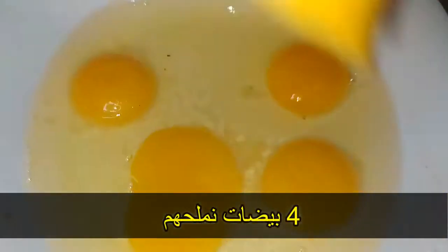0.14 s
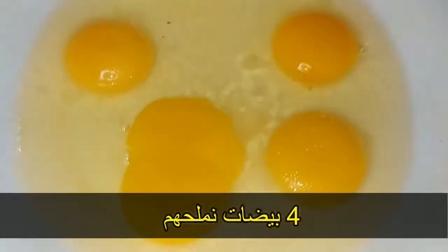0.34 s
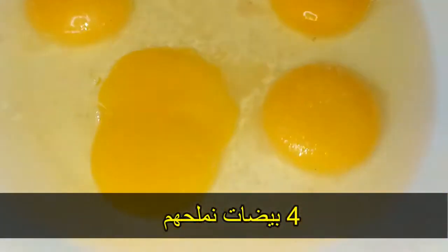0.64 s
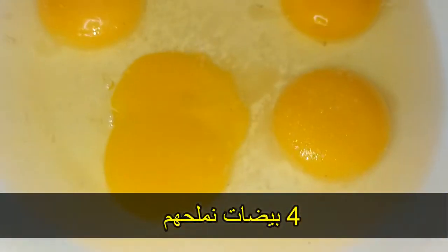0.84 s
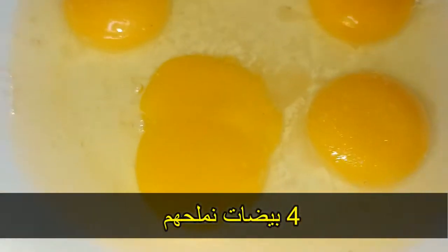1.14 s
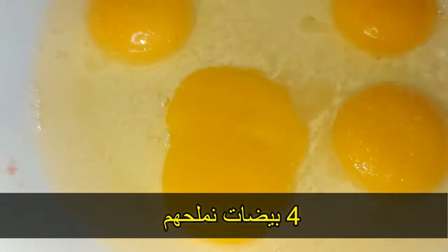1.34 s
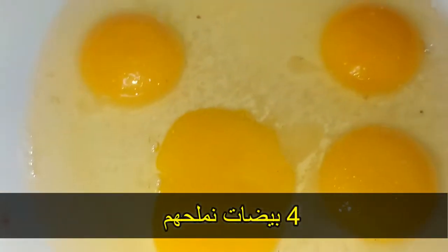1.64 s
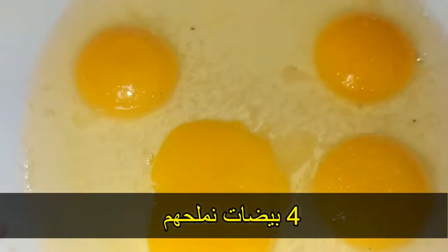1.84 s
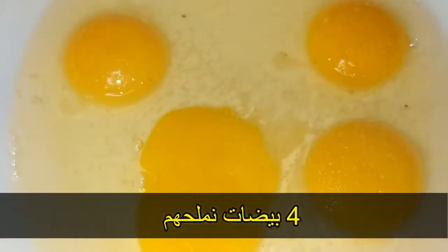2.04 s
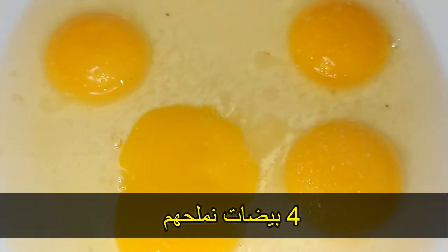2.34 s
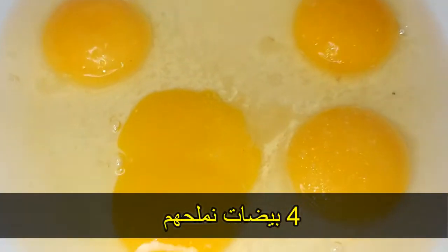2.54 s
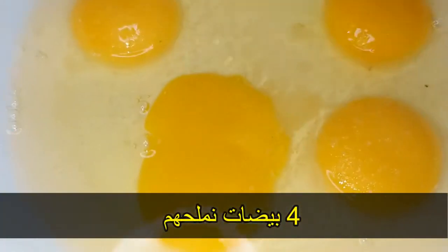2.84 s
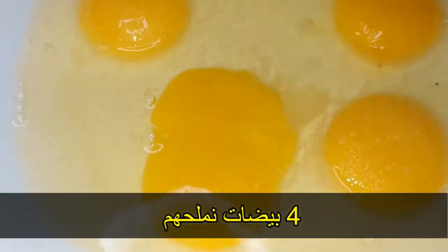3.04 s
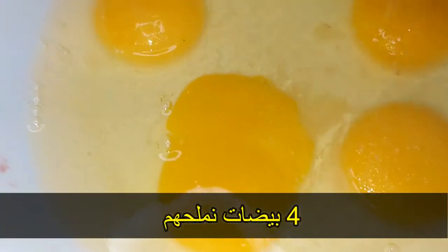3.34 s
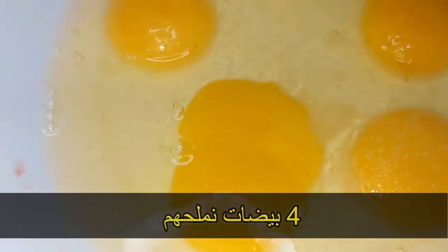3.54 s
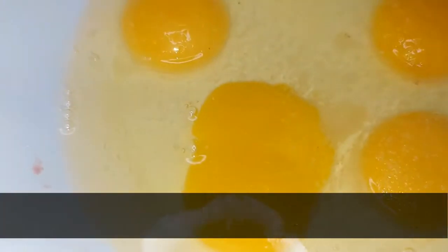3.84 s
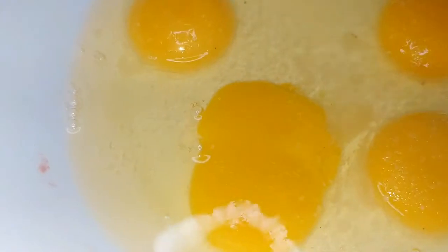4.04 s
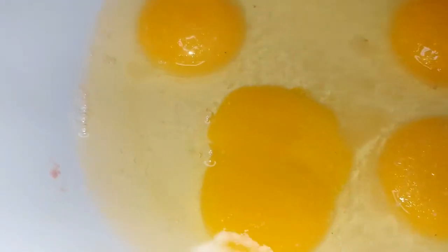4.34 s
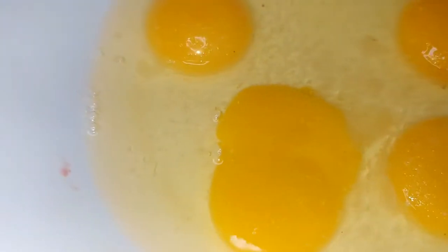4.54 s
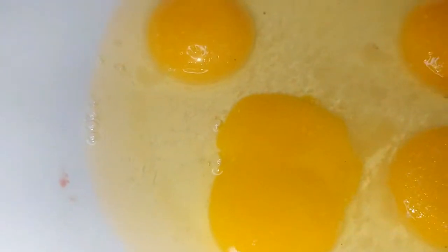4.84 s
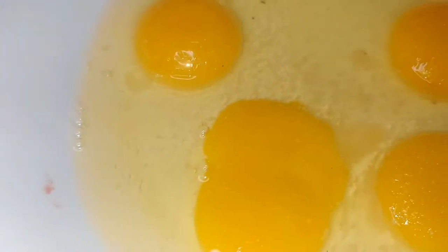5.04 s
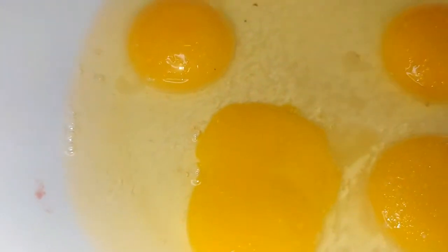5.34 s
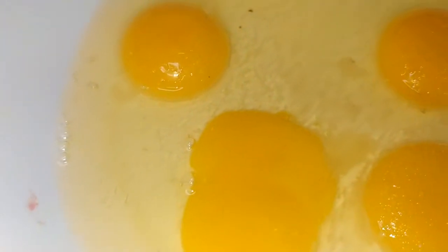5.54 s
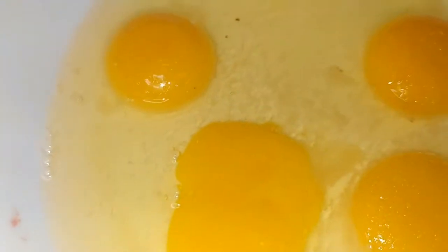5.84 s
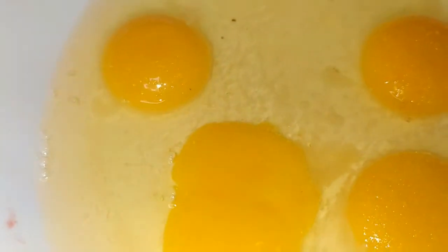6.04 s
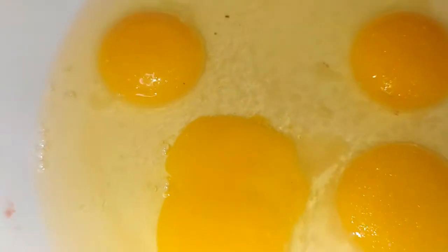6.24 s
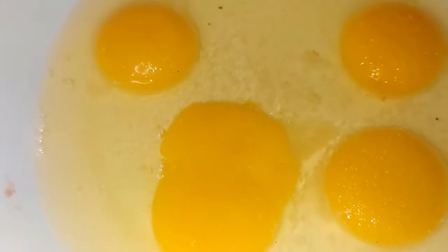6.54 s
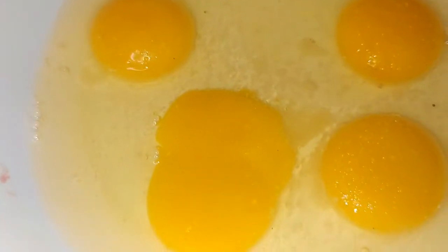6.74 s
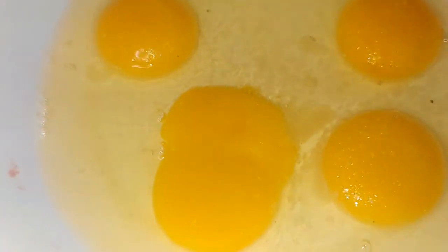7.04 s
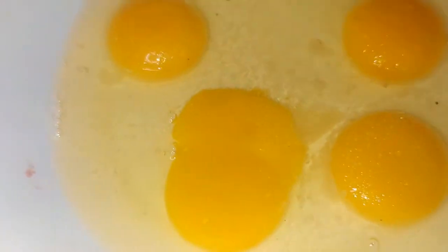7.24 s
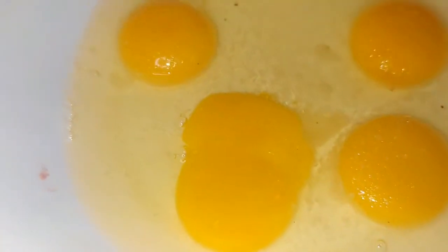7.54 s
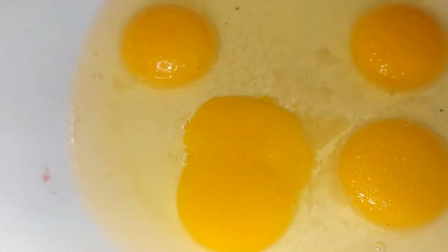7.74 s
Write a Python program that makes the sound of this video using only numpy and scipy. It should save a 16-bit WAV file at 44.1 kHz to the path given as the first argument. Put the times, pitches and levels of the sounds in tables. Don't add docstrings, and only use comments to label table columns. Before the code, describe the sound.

In a small hard kitchen, a refrigerator compressor hums steadily near 295 Hz, slightly wavering, over soft fan noise. From 0 to about 4.9 seconds, a plastic salt shaker is shaken close to two spaced microphones, roughly five cycles a second. Each cycle has a short, bright, sandy hiss as grains hit the cap, then a slightly longer, hollower swish as they fall down the body. The opening strokes are softer; packed lumps add sharper splashes, strongest around 2.6 to 3.4 seconds. At 2.96 seconds the shaker raps the bowl rim: a hard, dry clack with a low worktop thud and brief shudder. After 4.9 seconds, faint trickles fade into the hum. A hand makes a dull double bump on the worktop around 5.8 to 6.0. Sparse grains whisper, then tiny bright ticks and trickles appear from 7.4 to 7.85 seconds. Room echo is short.

```python
import sys
import numpy as np
from scipy import signal
from scipy.fft import rfft, irfft
from scipy.io import wavfile

SR = 44100
rng = np.random.default_rng(int(sys.argv[2]) if len(sys.argv) > 2 else 0)


def store_wav(level_fs):
    pcm = np.round(np.clip(np.atleast_2d(level_fs), -1, 1) * 32767)
    wavfile.write(sys.argv[1], SR, pcm.T.astype(np.int16))


def voltage_ratio(decibels):
    exponent = np.asarray(decibels, float) / 20
    return 10 ** exponent


N = 347508


def unit(x):
    return x / np.sqrt(np.mean(x ** 2) + 1e-20)


def at_hz(points, hz):
    points_hz, points_db = np.transpose(points)
    return np.interp(np.log(hz), np.log(points_hz), points_db)


def sides(pan_db):
    return voltage_ratio(np.multiply.outer([0.5, -0.5], pan_db))


def band_pass(x, order, band_hz):
    return signal.sosfilt(signal.butter(order, band_hz, "band", fs=SR, output="sos"), x)


def high_pass(x, order, hz):
    return signal.sosfilt(signal.butter(order, hz, "high", fs=SR, output="sos"), x)


def drift(rate_hz):
    r = np.exp(-80 * np.pi * rate_hz / SR)
    noise = rng.standard_normal(N // 40 + 2002)
    slow = signal.lfilter([1], [1, -2 * r, r * r], noise)[2000:]
    return np.interp(np.arange(N) / 40, np.arange(len(slow)), unit(slow))


def ring(clicks, hz, t60_s):
    r, w = voltage_ratio(-60 / (t60_s * SR)), 2 * np.pi * hz / SR
    return signal.lfilter([0, np.sin(w)], [1, -2 * r * np.cos(w), r * r], clicks + 1e-18)


def resonate(x, hz, width_hz):
    r = np.exp(-np.pi * width_hz / SR)
    feedback = [1, -2 * r * np.cos(2 * np.pi * hz / SR), r * r]
    return signal.lfilter([(1 - r * r) / 2, 0, (r * r - 1) / 2], feedback, x)


def landings():
    # densest fall in seconds, level in dB, build-up in ms.
    throw_rows = [(0.098, -43.5, 33), (0.284, -35.5, 16), (0.481, -32, 15), (0.674, -34, 22),
                  (0.865, -29.5, 18), (1.056, -35, 26), (1.273, -35.5, 18), (1.496, -35, 19.6),
                  (1.711, -32.5, 20), (1.935, -37.5, 20), (2.152, -35, 17), (2.375, -31.5, 11),
                  (2.592, -29.5, 8.3), (2.799, -34, 19), (2.992, -27.5, 12), (3.186, -33.5, 20),
                  (3.377, -27.5, 16), (3.581, -30, 13.6), (3.785, -32, 16.5), (3.986, -30, 15.6),
                  (4.195, -30, 11.5), (4.392, -32.5, 22), (4.576, -35.5, 19), (4.791, -36, 21)]
    # densest fall in seconds, level in dB, length in ms,
    # share of it spent building up (0-1).
    return_rows = [(0.171, -36.5, 59, .73), (0.357, -29.5, 49, 0.65), (0.556, -30, 46, 0.6),
                   (0.752, -32.5, 54, 0.77), (0.916, -28, 48, 0.38), (1.133, -28, 34, 0.86),
                   (1.352, -29, 39, 0.85), (1.542, -30.5, 47, 0.32), (1.758, -29, 40, .26),
                   (1.989, -27, 40, 0.27), (2.208, -27, 48, 0.23), (2.422, -29, 40, 0.05),
                   (2.642, -27, 33, .22), (2.846, -28, 45, .2), (3.055, -28.5, 57, 0.54),
                   (3.257, -26.5, 38, .77), (3.449, -25.5, 31, 0.86), (3.654, -27, 34, 0.82),
                   (3.852, -28, 34, 0.68), (4.053, -28.5, 45, 0.45), (4.266, -30, 48.5, .69),
                   (4.445, -31, 44, 0.46), (4.64, -29, 39, 0.54), (4.843, -33, 39, 0.53)]
    # densest fall in seconds, level in dB, length in ms, body in dB re hiss.
    stray_rows = [(.0, -41.5, 26, -12), (2.54, -48.5, 60, -10), (2.93, -39, 28, -7.5), (3.92, -44, 32, -5),
                  (4.925, -46.5, 49, -5), (5.065, -50.5, 64, -15), (5.145, -52, 38, -25),
                  (5.3, -49, 20, -20), (5.777, -47.5, 12, -7), (5.925, -55.5, 84, 2), (6.06, -52, 13, -10),
                  (6.497, -48, 9, -21), (6.915, -50.5, 29, -4), (7.174, -49.5, 16, -13),
                  (7.41, -53, 70, -1.5), (7.625, -47, 60, -11), (7.665, -51, 50, -15),
                  (7.778, -43, 14, -22), (7.823, -45.5, 65, -17)]
    # time in seconds, body in dB re hiss.
    tipping = [(0.1, -17), (0.6, -14), (1.4, -11.5), (2.2, -10.5), (4.5, -10), (4.9, -14.5)]

    falls = []
    for s, db, rise_ms in throw_rows:
        fall_ms = 6 * voltage_ratio(-31.5 - db)
        falls.append((s, db, rise_ms, fall_ms, -24.5, 3.5))
    for s, db, ms, build in return_rows:
        body_db = np.interp(s, *np.transpose(tipping))
        falls.append((s, db, ms * build, ms * max(1 - build, 0.05), body_db, 0.3))
    for s, db, ms, body_db in stray_rows:
        falls.append((s, db, ms * 0.4, ms * 0.6, body_db, 1.5))
    return falls


def add_falls(hiss_power, hollow_power):
    t = np.arange(N) / SR
    for s, level_db, rise_ms, fall_ms, body_db, pan_db in landings():
        near = slice(max(0, round((s - 0.15) * SR)), round((s + 0.15) * SR))
        ms = (t[near] - s) * 1000
        reach = np.abs(ms) / np.where(ms < 0, rise_ms, fall_ms)
        flow = voltage_ratio(level_db - 7 * reach ** 2.5) * sides(pan_db)[:, None]
        hiss_power[:, near] += flow ** 2
        lead = round(0.1 * rise_ms * SR / 1000)
        thud = np.roll(flow * voltage_ratio(-4.0 * reach * (ms > 0)), -lead, axis=1)
        hollow_power[:, near] += (thud * voltage_ratio(body_db - 2.0)) ** 2


def add_lumps(hiss_power, hollow_power):
    # start in seconds, peak in dB.
    cap_rows = [(0.1657, -17), (0.476, -16), (0.8555, -18), (0.9063, -21), (1.2595, -19.5), (1.6945, -29),
                (2.371, -28), (2.5855, -23), (3.178, -13), (3.37, -10.5), (3.5758, -20), (3.778, -19),
                (4.1897, -14.5), (4.5707, -18)]
    # start in seconds, peak in dB.
    bottom_rows = [(1.7549, -29), (1.9784, -22), (2.2019, -20), (2.4199, -24), (2.6376, -10), (2.8374, -17),
                   (3.2244, -26), (3.4215, -24), (3.6244, -15), (3.8372, -21), (4.6194, -31), (7.7757, -41)]
    t = np.arange(2000) / SR
    rise = np.minimum(t * 1000 / 1.64, 1)
    for rows, body_db in ((cap_rows, -27), (bottom_rows, -20)):
        for s, peak_db in rows:
            at = round(s * SR)
            splash = (voltage_ratio(peak_db - 8.5 - 60 * t / 0.038) * rise) ** 2
            hiss_power[:, at:at + 2000] += splash
            hollow_power[:, at:at + 2000] += splash * voltage_ratio(2 * body_db - 6.0)


def wall_hiss(grains, cycles=52.0, patch_db=3.5):
    # frequency in Hz, level in dB per Hz.
    grain_spectrum = [(4490, -10), (5710, -22.5), (7040, -8), (8050, -19.5), (8900, -6), (9800, -4.5),
                      (10700, -8.5), (12300, -27.5), (14000, -18), (15600, -28)]
    pitches_hz = np.geomspace(5000, 15700, 28)
    dealt = rng.integers(0, 28, (2, N))
    walls = 0
    for k, hz in enumerate(pitches_hz):
        gain = voltage_ratio(at_hz(grain_spectrum, hz) + patch_db * drift(6.5)) * hz
        walls = walls + gain * ring(grains * (dealt == k), hz, cycles / hz)
    return unit(band_pass(walls, 2, [5600, 16500]))


def hollow_body(grains, patch_db=2.23):
    # frequency in Hz, width in Hz, level in dB.
    body_modes = [(1803, 360, 8.5), (2424, 78, -3.5), (2827, 410, 3), (3310, 620, 9.5), (3976, 930, 8),
                  (4456, 1170, 7.5)]
    body = 0
    for hz, width_hz, db in body_modes:
        mode = resonate(resonate(grains, hz, width_hz), hz, 2 * width_hz)
        body = body + voltage_ratio(db + patch_db * drift(6.8)) * mode / np.sqrt(width_hz)
    return unit(high_pass(body, 4, 1450))


def salt(grains_per_s=16000, spread_db=2.0, clump_db=1.73):
    hiss_power, hollow_power = np.zeros((2, N)), np.zeros((2, N))
    add_falls(hiss_power, hollow_power)
    add_lumps(hiss_power, hollow_power)
    sizes = voltage_ratio(spread_db * np.minimum(rng.exponential(1, N), 5) + clump_db * drift(41))
    strikes = sizes * (rng.random(N) < grains_per_s / SR)
    grains = strikes * rng.choice([-1, 1], (2, N))
    hiss = wall_hiss(grains) * np.sqrt(hiss_power) * voltage_ratio(-2.5)
    return hiss + hollow_body(grains) * np.sqrt(hollow_power) * voltage_ratio(0.5)


def compressor(shaft_hz=49.09):
    # multiple of shaft speed, level in dB rms.
    hum_lines = [(1, -67), (3, -70), (5, -67), (6, -43.5), (7, -64), (8, -65), (11, -67.5), (15.2, -76)]
    # time in seconds, level in dB.
    swell_points = [(0.0, -53), (0.6, -52.6), (1.0, -53), (1.7, -52), (3.2, -51.4), (4.2, -52),
                    (4.5, -51.5), (5.5, -51.5), (6.2, -51.5), (6.9, -52.5), (7.88, -51.5)]
    turn = 2 * np.pi * np.cumsum(shaft_hz * (1 + 0.00075 * drift(0.88))) / SR
    s, swell_db = np.transpose(swell_points)
    swell_db = np.interp(np.arange(N) / SR, s, swell_db - np.mean(swell_db))
    out = 0
    for k, db in hum_lines:
        waver_db = swell_db + 1.0 * drift(50) if k == 6 else 2.44 * drift(2.8)
        phase = rng.uniform(0, 2 * np.pi) + np.array([[0], [0.15]]) * k / 6
        out = out + np.sqrt(2) * voltage_ratio(db + waver_db) * np.sin(k * turn + phase)
    return out


def fan(flicker_db=0.84):
    # frequency in Hz, level in dB per Hz.
    low_spectrum = [(12, -78.5), (25, -82), (50, -83.5), (80, -92), (120, -95.5), (165, -87.5),
                    (260, -92.5), (400, -88.5), (600, -92.5)]
    high_spectrum = [(600, -91), (1000, -96.5), (1500, -97.5), (2000, -95.5), (2700, -88), (3500, -101),
                     (4200, -93), (6000, -102), (7200, -99), (8000, -99), (8900, -91.5), (10200, -98.5),
                     (11500, -101), (14000, -107), (16000, -116), (18000, -140)]
    # frequency in Hz, left-right likeness (-1 to 1).
    likeness = [(60, 0.54), (180, 0.81), (550, 0.14), (1400, 0), (5000, 0), (15000, 0.15)]
    # frequency in Hz, left-right difference in dB.
    tilt = [(60, -0.5), (200, -2), (700, 0), (2400, 2), (4400, 0.5), (8000, 1), (15000, 4)]
    # frequency in Hz, width in Hz, gain in dB.
    narrow_bands = [(3330, 100, 6), (4770, 170, -9.5), (5780, 160, 0), (8300, 180, 0.5), (11800, 400, -9)]

    hz = np.maximum(np.arange(N // 2 + 1) * SR / N, 1)
    level_db = at_hz([*low_spectrum, *high_spectrum[1:]], hz)
    for dip_hz, width_hz, db in narrow_bands:
        level_db = level_db + db * np.exp(-((hz - dip_hz) / width_hz) ** 2)
    gain = voltage_ratio(level_db) * sides(at_hz(tilt, hz)) * np.sqrt(SR / 2)
    mid, side = rfft(rng.standard_normal((2, N)))
    alike = np.clip(at_hz(likeness, hz), -1, 1)
    pair = np.sqrt(1 + alike) * mid + np.sqrt(1 - alike) * side * [[1], [-1]]
    return irfft(gain * pair, N) * voltage_ratio(flicker_db * drift(5.5))


def bumps():
    # start in seconds, peak in dB, low push in dB,
    # brightness in Hz, decay t60 in seconds.
    bump_rows = [(1.908, -38.5, -64, 1210, 0.033), (2.268, -27.5, -67, 2770, 0.027),
                 (3.03, -27, -45, 342, 0.12), (3.07, -48, -51, 298, 0.38), (5.772, -44.5, -40, 1900, 0.055),
                 (5.798, -48, -47, 500, 0.12), (5.866, -48, -51.5, 1200, 0.15),
                 (5.894, -51, -48, 1080, 0.18), (5.92, -50, -55, 1290, 0.21),
                 (5.962, -25.5, -40, 520, 0.11), (5.964, -32.5, -58, 1730, 0.06),
                 (5.984, -37, -46, 555, 0.12), (6.02, -49, -53, 900, 0.13)]
    out = np.zeros((2, N + SR))
    t = np.arange(SR // 4) / SR
    for s, db, low_db, hz, t60_s in bump_rows:
        noise = rng.standard_normal((3, len(t)))
        fade = voltage_ratio(-60 * t / t60_s) * np.minimum(t / 0.0067, 1)
        puff = unit(band_pass(noise[0] + 0.64 * noise[1:], 3, [170, max(hz, 300)]))
        push = unit(band_pass(noise[0], 2, [75, 260]))
        bump = voltage_ratio(db) * puff * fade + voltage_ratio(low_db) * push * fade ** 0.55
        at = round(s * SR)
        out[:, at:at + len(t)] += bump * sides(-0.8)[:, None]
    return out[:, :N]


def burst(db, band_hz, t60_s):
    noise = band_pass(rng.standard_normal((2, SR)), 2, band_hz)
    return voltage_ratio(db - 60 * np.arange(SR) / SR / t60_s) * unit(noise)


def rap(start_s=2.9581, lead_ms=0.6, scatter_ms=0.88, push_s=0.0086, shudder_s=0.18):
    # frequency in Hz, level in dB, t60 in seconds.
    rim_modes = [(2060, -25.5, 0.02), (2300, -38.5, 0.16), (2630, -26, 0.0073), (3180, -27, 0.033),
                 (3800, -31, 0.012), (4450, -18.5, 0.0094), (5400, -41, 0.0039), (6600, -41, 0.0039),
                 (8100, -22, 0.0046), (9100, -13, 0.0038), (10750, -22, 0.0044), (13900, -27, .004)]
    # frequency in Hz, level in dB, t60 in seconds.
    worktop_modes = [(93, -50, 0.08), (125, -40, 0.085), (169.7, -33, 0.28), (211, -31, 0.2),
                     (251, -29, 0.11), (288.3, -26.5, 0.14), (366, -31.5, 0.049), (467, -30.5, 0.034),
                     (656, -39.5, 0.05), (753, -39.5, 0.048), (1060, -39.5, 0.031), (1400, -47, 0.044)]
    out, t = np.zeros((2, N)), np.arange(SR) / SR
    at = round(start_s * SR)
    span = slice(at, at + SR)
    for hz, db, t60_s in rim_modes:
        touch = rng.standard_normal((2, SR)) * 0.55 * np.exp(-t * 1000 / scatter_ms)
        out[:, span] += voltage_ratio(db) * ring(touch, hz, t60_s)
    out[0] = np.roll(out[0], round(lead_ms * SR / 1000))

    settle = np.exp(-t / push_s)
    shape = t / push_s * settle + 0.16 * (1 - settle) * np.exp(-t / shudder_s)
    push = (rng.standard_normal(SR) + 0.18 * rng.standard_normal((2, SR))) * shape * 0.067
    for k, (hz, db, t60_s) in enumerate(worktop_modes):
        out[:, span] += voltage_ratio(db) * ring(push, hz, t60_s) * (-1) ** k
    out[:, span] += burst(-36.5, [1900, 3350], 0.35)
    out[:, span] += burst(-18, [3400, 5030], 0.009)
    return out


def ticks():
    # start in seconds, level in dB, frequency in Hz, t60 in seconds.
    tick_rows = [(7.403, -45, 7200, 0.032), (7.405, -48, 9800, 0.026), (7.632, -52, 5200, 0.065),
                 (7.634, -52, 9500, .03), (7.66, -47, 7400, .03), (7.682, -45, 7200, .03),
                 (7.777, -39, 7130, 0.019), (7.817, -47.5, 5300, .06), (7.82, -47, 1670, 0.057),
                 (7.818, -43, 7500, .05), (7.822, -50, 4000, 0.05), (6.645, -55, 1050, 0.045)]
    out = np.zeros((2, N + 4000))
    fade = np.exp(-np.arange(4000) / (0.0022 * SR))
    for s, db, hz, t60_s in tick_rows:
        touch = rng.standard_normal((2, 4000)) * 0.28 * fade
        at = round(s * SR)
        out[:, at:at + 4000] += voltage_ratio(db) * ring(touch, hz, t60_s)
    return out[:, :N]


def room(x, t60_s, wet_db, gap_s):
    t = np.arange(int(0.6 * SR)) / SR
    echoes = rng.standard_normal((2, len(t))) * voltage_ratio(-60 * t / t60_s) * (t > gap_s)
    echoes /= np.sqrt(np.sum(echoes ** 2, axis=1, keepdims=True))
    return x + voltage_ratio(wet_db) * signal.fftconvolve(x, echoes, axes=1)[:, :N]


def scene():
    shaker = room(salt() + ticks(), 0.2, -8.0, 0.00073)
    knocks = room(rap() + bumps(), 0.21, -7, 0.003)
    return shaker + knocks + compressor() + fan()


def low_pass(x):
    return signal.sosfilt(signal.butter(12, 15750, fs=SR, output="sos"), x)


def record(dry):
    top = high_pass(dry, 2, 11000)
    return low_pass(dry + top * [[0.35], [-0.3]])


dry = scene()
out = record(dry)
store_wav(out)
```